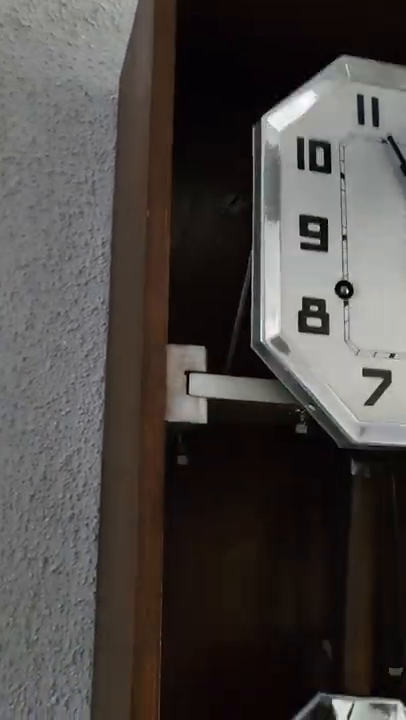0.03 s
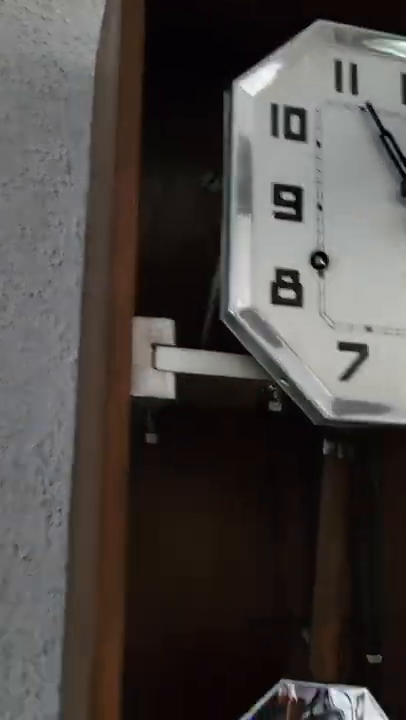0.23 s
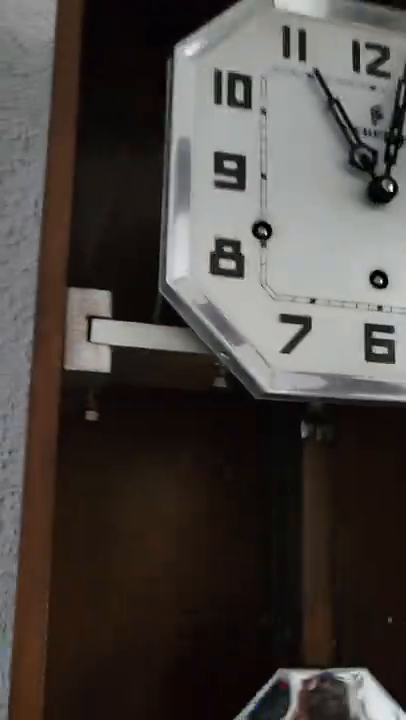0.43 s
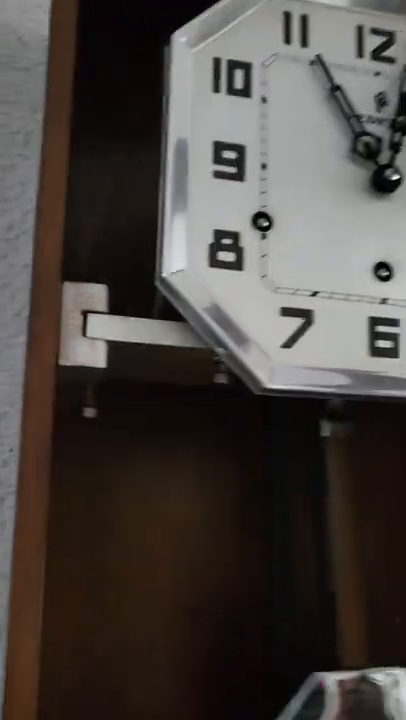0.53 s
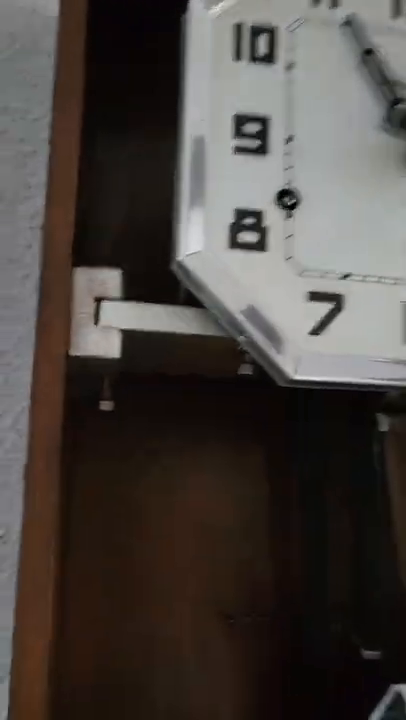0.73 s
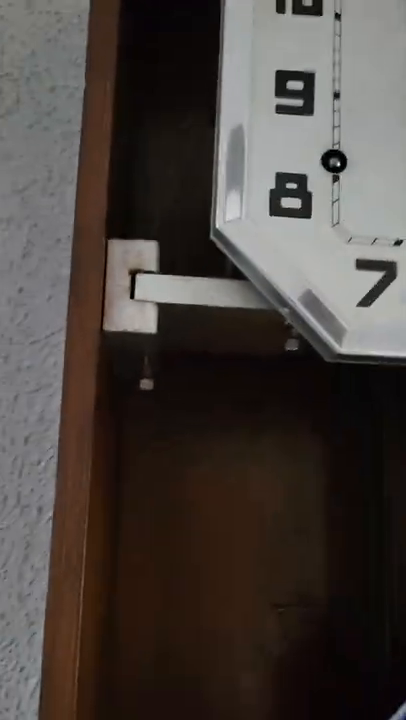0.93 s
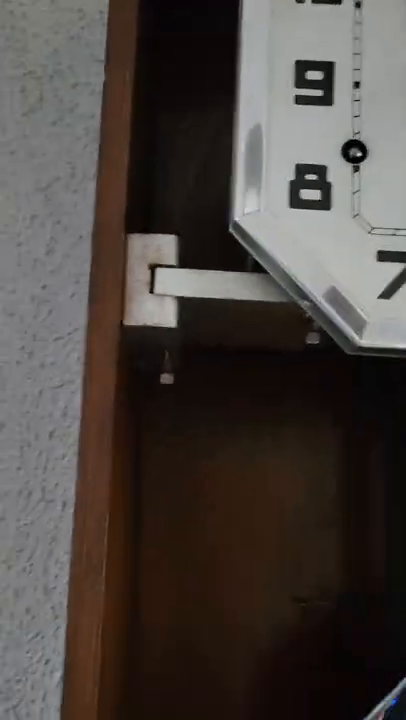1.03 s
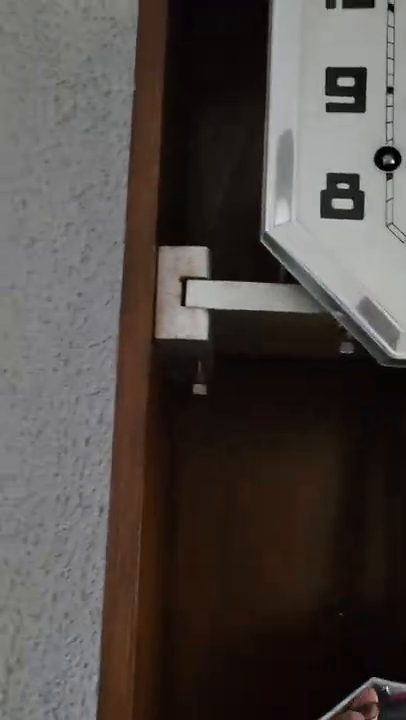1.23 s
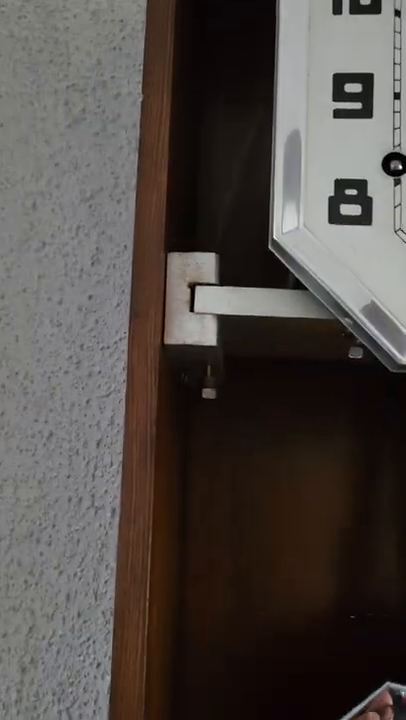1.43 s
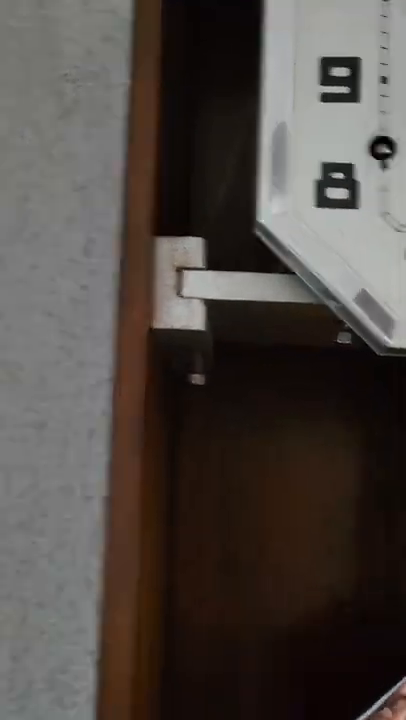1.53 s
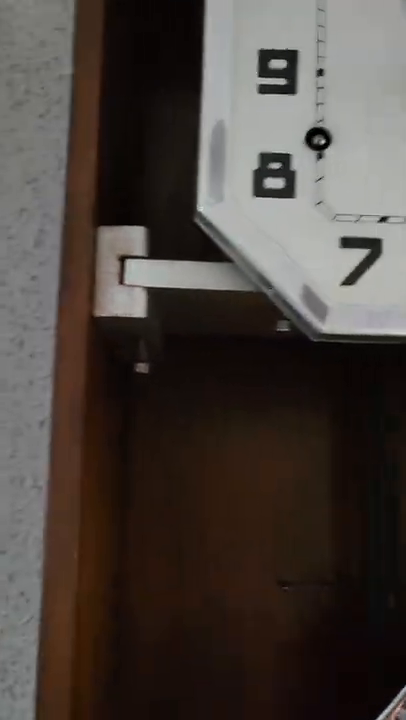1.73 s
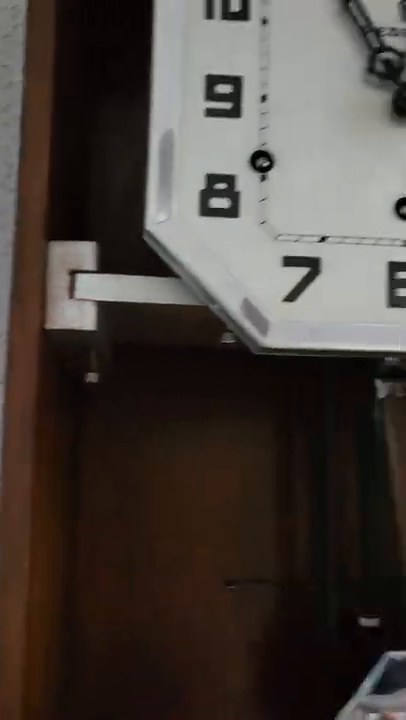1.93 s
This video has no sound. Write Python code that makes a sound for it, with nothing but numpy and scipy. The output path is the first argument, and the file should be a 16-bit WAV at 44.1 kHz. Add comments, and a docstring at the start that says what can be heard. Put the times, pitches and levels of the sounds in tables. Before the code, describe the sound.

Soft pendulum clock ticking in a quiet room, interrupted early by a sharp wooden knock.

```python
"""A quiet room, a microphone pair near a pendulum wall clock in its open wooden case.
The clock ticks slightly out of beat as its escape wheel drops on two pallets in turn.
Near the start a handled wooden part squeaks and knocks in a quick run of contacts, then come
a dull double thud and a small bump. The gong rods sing faintly over low rumble and thin hiss."""
import sys
import numpy as np
from scipy import signal
from scipy.io import wavfile

SR = 44100
rng = np.random.default_rng(int(sys.argv[2]) if len(sys.argv) > 2 else 0)


def digitize_waveform(pressure):
    """Quantize a signal to 16-bit integers and store it at the path in sys.argv[1].

    Rows of a 2-D input are taken as channels; values are limited to [-1, 1].
    """
    field = np.atleast_2d(pressure).T
    bounded = np.clip(field, -1, 1)
    quanta = np.round(bounded * 32767).astype(np.int16)
    wavfile.write(sys.argv[1], SR, quanta)


N = 88200
T = np.arange(N) / SR

# The escapement's beats. Each row: start in seconds, gain in dB, pallet (0 entry, 1 exit).
BEATS = [(0.011, -3.5, 0), (0.6303, 3, 1), (1.1638, -2, 0), (1.7814, 3.5, 1)]
# The movement's dense ring on each pallet. Each row: frequency in Hz, level in dB per third octave.
ENTRY_SPECTRUM = [(40, -93.5), (300, -73), (750, -72.5), (1250, -53), (2200, -53.5), (3400, -61.5),
                  (5000, -58), (7000, -63.5), (9200, -64), (14000, -64)]
EXIT_SPECTRUM = [(40, -73), (300, -88), (800, -79), (1350, -67), (2000, -59), (2800, -74), (3500, -65.5),
                 (4400, -65), (7000, -76), (10500, -65), (14000, -76)]
# Its ringing parts. Each row: frequency in Hz, level in dB on the entry pallet and on the exit pallet,
# t60 in seconds, left over right in dB.
CLOCK_MODES = [(1225, -57, -60, 0.25, -2.5), (1297.7, -53.5, -60, 0.3, 9.5),
               (1375.4, -64.5, -52.5, 0.075, -0.5), (1416, -59, -52, .16, 2),
               (2260, -50.5, -56, 0.086, -5.5), (2915, -60.5, -51.5, 0.05, -5),
               (9106, -58.5, -85, 0.013, 10.5)]
TICK_RISE_S = .0015


def clock():
    """The escape wheel drops on the two pallets in turn; each rings the movement in its own colour."""
    out = 0
    for pallet, spectrum in enumerate((ENTRY_SPECTRUM, EXIT_SPECTRUM)):
        drops = [(s, db, TICK_RISE_S, 0) for s, db, which in BEATS if which == pallet]
        rings = sum(mode(s, hz, db + pallet_db[pallet], TICK_RISE_S, t60, pan_db)
                    for s, db, _, _ in drops for hz, *pallet_db, t60, pan_db in CLOCK_MODES)
        out += blows(drops, spectrum, t60=.07, room_db=-9.5) + with_room(rings, room_db=-12)
    return out


# Wood meeting wood. Each row: start in seconds, gain in dB, rise in seconds, extra bass in dB.
KNOCKS = [(0.1925, -21, 0.0035, -8.5), (0.1982, -8, 0.0042, -11.5), (0.2105, -2.5, 0.0027, -11),
          (0.2280, -3, 0.0027, -4), (0.2315, -0.5, 0.00088, -5), (0.2368, -12.5, 0.0012, 4.5)]
# The wood's dense ring. Each row: frequency in Hz, level in dB per third octave.
WOOD_SPECTRUM = [(35, -88.5), (140, -56.5), (270, -44), (420, -38.5), (700, -26.5), (1300, -26),
                 (1900, -21), (3400, -25.5), (4400, -22.5), (6800, -36.5), (8300, -55), (10200, -39.5),
                 (12000, -45.5), (15000, -46)]
# Its modes. Each row: frequency in Hz, level in dB, t60 in seconds, left over right in dB.
WOOD_MODES = [(238, -40, 0.71, -1.5), (294.5, -36, 0.28, -1.5), (318.5, -34, 0.21, 2.5),
              (509, -39, 0.34, 1.5), (645.6, -31, 0.23, 0), (708.2, -38, .28, 8.5), (852, -30, .36, -0.5),
              (966, -32, 0.25, 0.5), (1306, -34, 0.3, -0.5), (1428, -37, 0.36, -0.5),
              (1636, -30.5, 0.15, -4), (1680, -30.5, .19, -2), (1931, -26.5, 0.22, -9),
              (2213, -33, 0.26, -3.5), (2753, -30, 0.11, 5), (3517, -43.5, 0.1, 0), (4510, -32, 0.12, 1.5)]
WOOD_RISE_S = .0026


def knock():
    """A quick run of contacts on wood, close by; the hardest rings the body's modes."""
    s, db, *_ = max(KNOCKS, key=lambda row: row[1])
    rings = sum(mode(s, hz, db + mode_db, WOOD_RISE_S, t60, pan_db)
                for hz, mode_db, t60, pan_db in WOOD_MODES)
    return blows(KNOCKS, WOOD_SPECTRUM, t60=.068, room_db=-13) + with_room(rings, room_db=-11.5)


def squeak(start_s=.2095, hz=988.3, rise_s=.006, hold_s=.019, t60=.06, echo_s=.026, beat_hz=10.3):
    """Wood sticks and slips in one short note, a little to the left; it echoes once and lingers."""
    def held(age):
        return np.clip(age / rise_s, 0, 1) * from_db(-60 * np.maximum(age - hold_s, 0) / t60)

    age = T - start_s
    note = from_db(-15.5) * (held(age) + from_db(-9) * held(age - echo_s))
    beating = 1 + .75 * np.exp(2j * np.pi * beat_hz * age)
    tail = from_db(-32) * dying(age, rise_s, t60=.59) * beating
    mic_lag_s = np.array([[0], [.0002]])  # the right microphone hears it later
    carrier = np.exp(2j * np.pi * hz * (age - mic_lag_s))
    return with_room(pan(2.5) * np.imag((note + tail) * carrier), room_db=-22)


# Thuds on the case. Each row: start in seconds, gain in dB, rise in seconds.
THUDS = [(0.25, -8, 0.022), (0.319, -2.5, 0.0051)]
# Their dull colour. Each row: frequency in Hz, level in dB per third octave.
THUD_SPECTRUM = [(25, -71.5), (50, -46), (110, -46), (160, -49.5), (300, -69.5)]


def thuds():
    """Two dull thuds rock the case; the last sounds its low note, mostly in the right microphone."""
    hits = [(s, db, rise, 0) for s, db, rise in THUDS]
    body = blows(hits, THUD_SPECTRUM, t60=.07, room_db=-6.5)
    return body + mode(THUDS[-1][0], hz=74, db=-32, rise=.016, t60=.045, pan_db=-18)


# Soft handling bumps. Each row: start in seconds, gain in dB, extra bass in dB.
BUMPS = [(0.6219, -3, 1), (0.629, -2, 6.5)]
# Their colour. Each row: frequency in Hz, level in dB per third octave.
BUMP_SPECTRUM = [(70, -68), (230, -67.5), (320, -53), (480, -57), (950, -53.5), (1400, -59.5),
                 (2100, -50.5), (3000, -61.5), (4400, -53.5), (7000, -71), (12000, -95)]
# The case's ring. Each row: frequency in Hz, level in dB, t60 in seconds, left over right in dB.
CASE_MODES = [(312, -51.5, 0.2, 7), (1323, -48.5, 0.18, -4), (2880, -67, 0.68, -3)]


def bump():
    """Two soft touches merge into one bump; the second sets the case ringing."""
    rings = sum(mode(BUMPS[-1][0], hz, db, WOOD_RISE_S, t60, pan_db)
                for hz, db, t60, pan_db in CASE_MODES)
    touches = [(s, db, TICK_RISE_S, bass_db) for s, db, bass_db in BUMPS]
    return rings + blows(touches, BUMP_SPECTRUM, t60=.1, room_db=-15)


# The room's decay. Each row: frequency in Hz, t60 in seconds.
ROOM_T60 = [(80, 0.54), (250, 1.53), (500, 0.3758), (1200, 0.58), (2500, 0.61), (5000, 0.535), (12000, 0.5)]
# The colour coming back off the walls. Each row: frequency in Hz, gain in dB.
ROOM_COLOUR = [(100, 0.5), (450, 0), (1000, 2.5), (2200, -1), (5000, -5), (7000, -2.5), (9000, -4),
               (13000, -10.5)]
ROOM_BUILD_S, BASS_CORNER_HZ = .0017, 437


def blows(hits, spectrum, t60, room_db):
    """Hits, laid out as in KNOCKS, on a body with countless short modes; the room answers each."""
    out = np.zeros((2, N))
    direct_powers = [dying(T - s, rise, t60) ** 2 for s, _, rise, _ in hits]
    for hz, band in noise_bands():
        room_gain = from_db(room_db + at_hz(ROOM_COLOUR, hz))
        tail_power = (room_gain * dying(T, ROOM_BUILD_S, at_hz(ROOM_T60, hz))) ** 2
        bass_share = 1 / (1 + (hz / BASS_CORNER_HZ) ** 2)
        power = np.zeros(N)
        for (s, db, _, bass_db), direct_power in zip(hits, direct_powers):
            start = int(s * SR)
            gain = from_db(db + bass_db * bass_share)
            power[start:] += gain ** 2 * (direct_power[start:] + tail_power[:N - start])
        out += from_db(at_hz(spectrum, hz)) * np.sqrt(power) * band
    return out


def with_room(direct, room_db):
    """The direct sound plus its diffuse echo off the walls."""
    echo = rng.standard_normal((2, N)) * dying(T, ROOM_BUILD_S, at_hz(ROOM_T60, 1000))
    response = rms_one(echo) / np.sqrt(N)
    return direct + from_db(room_db) * signal.fftconvolve(direct, response, axes=1)[:, :N]


# The microphone pair's balance. Each row: frequency in Hz, left over right in dB.
MIC_BALANCE = [(35, -13), (70, -7.5), (130, -6.5), (220, -5), (400, -2.5), (1250, -6.5), (2300, -8.5),
               (4400, -1.5), (8000, 7.5), (15000, 7.5)]
# How alike its two channels are. Each row: frequency in Hz, correlation from 0 to 1.
MIC_LIKENESS = [(50, .6), (140, 1), (300, 0.45), (640, 0.78), (1400, 0), (15000, 0.076)]


def noise_bands():
    """Third-octave bands of noise as the microphone pair hears them, each at unit level."""
    white = rng.standard_normal((2, 2, N + SR // 4))
    for k, hz in enumerate(25 * 2 ** (np.arange(29) / 3)):
        edges_hz = hz * 2 ** (np.array([-1, 1]) / 6)
        bandpass = signal.butter(2, edges_hz, "band", fs=SR, output="sos")
        mid, side = signal.sosfilt(bandpass, white[k % 2])[:, -N:]
        alike = at_hz(MIC_LIKENESS, hz)
        pair = np.sqrt(1 + alike) * mid + np.sqrt(1 - alike) * side * [[1], [-1]]
        yield hz, pan(at_hz(MIC_BALANCE, hz)) * rms_one(pair)


def mode(s, hz, db, rise, t60, pan_db):
    """One struck mode, reaching the two microphones a little out of step."""
    age = T - s
    phase = rng.uniform(0, 2 * np.pi) + rng.normal(0, 1 - at_hz(MIC_LIKENESS, hz), (2, 1))
    return from_db(db) * pan(pan_db) * dying(age, rise, t60) * np.sin(2 * np.pi * hz * age + phase)


# The low hum's swells. Each row: time in seconds, level in dB.
HUM_LEVEL = [(0, -72), (.5, -59), (.74, -73), (.87, -63.5), (1.0, -64), (1.11, -74.5), (1.18, -57.5),
             (1.3, -64), (1.42, -72), (1.58, -63.5), (1.7, -78.5), (1.81, -63.5), (1.95, -102)]
# Lingering tones. Each row: frequency in Hz, level in dB, width in Hz.
ROD_TONES = [(96.57, -70.5, 20), (1923, -89.5, 6.4)]


def gong_rods(hum_hz=142.7):
    """The rods sing faintly behind the ticks: a wavering low hum and two lingering tones."""
    hum = rms_one(np.sin(2 * np.pi * hum_hz * T + .5 * drift(15)))
    out = pan(at_hz(MIC_BALANCE, hum_hz)) * from_db(in_time(HUM_LEVEL)) * hum
    for hz, db, width_hz in ROD_TONES:
        phase = 2 * np.pi * hz * T
        tone = drift(width_hz) * np.sin(phase) + drift(width_hz) * np.cos(phase)
        out += pan(at_hz(MIC_BALANCE, hz)) * from_db(db) * rms_one(tone)
    return out


# Room tone and handling rustle. Each row: frequency in Hz, level in dB per third octave.
ROOM_TONE_SPECTRUM = [(25, -99), (50, -75.5), (100, -75.5), (180, -76.5), (230, -75), (320, -79),
                      (420, -84), (600, -94.5), (850, -83), (1250, -86), (1700, -89), (2200, -87.5),
                      (3000, -96.5), (8200, -92), (11000, -80.5), (13000, -84.5), (15500, -96.5)]
RUSTLE_SPECTRUM = [(60, -76.5), (300, -77), (480, -75.5), (600, -89.5), (850, -76.5), (1200, -70),
                   (1700, -78.5), (3300, -84), (4100, -78.5), (8200, -89), (12000, -80.5), (14000, -94.5)]
# The rustle's rise and fall. Each row: time in seconds, gain in dB.
RUSTLE_GAIN = [(0, -4), (.17, -3.5), (.58, -2), (.72, -14.5), (.9, -5), (1.02, -3.5), (1.07, -3),
               (1.15, -2), (1.35, -9.5), (1.6, -15.5), (2, -29)]


def room_tone(flicker_db=.5):
    """Low rumble, thin hiss and a faint rustle of handling; each band flickers slightly."""
    rustle_gain = from_db(in_time(RUSTLE_GAIN))
    out = 0
    for hz, band in noise_bands():
        steady = from_db(at_hz(ROOM_TONE_SPECTRUM, hz))
        rustle = rustle_gain * from_db(at_hz(RUSTLE_SPECTRUM, hz))
        out += band * np.hypot(steady, rustle) * from_db(flicker_db * drift(14))
    return out


def dying(age, rise, t60):
    """Envelope that swells over the rise time, then falls 60 dB every t60 seconds."""
    return np.clip(age / rise, 0, 1) * np.exp(-np.log(1000) * np.maximum(age - rise, 0) / t60)


def drift(rate_hz):
    """A random wander, gliding to a new value rate_hz times a second."""
    knots = rng.standard_normal(int(rate_hz * N / SR) + 2)
    return np.interp(T * rate_hz, np.arange(len(knots)), knots)


def at_hz(points, hz):
    """Read a curve on a log-frequency axis."""
    freqs, values = np.transpose(points)
    return np.interp(np.log(hz), np.log(freqs), values)


def in_time(points):
    """Read a curve at every sample."""
    return np.interp(T, *np.transpose(points))


def pan(db):
    """Microphone gains at constant total power, left over right by db."""
    return rms_one(from_db([[db / 2], [-db / 2]]))


def from_db(db):
    """Decibels to gain."""
    return 10 ** (np.asarray(db) / 20)


def rms_one(x):
    """Scale to unit level."""
    return x / np.sqrt(np.mean(x ** 2) + 1e-20)


def scene():
    """The clock and the handled wood in front, the rods and the room behind."""
    return clock() + knock() + squeak() + thuds() + bump() + gong_rods() + room_tone()


def record(dry, cutoff_hz=15900):
    """Both microphone channels lose their very top to a steep low-pass."""
    return signal.sosfilt(signal.ellip(12, .1, 80, cutoff_hz, fs=SR, output="sos"), dry)


dry = scene()
out = record(dry)
digitize_waveform(out)
```